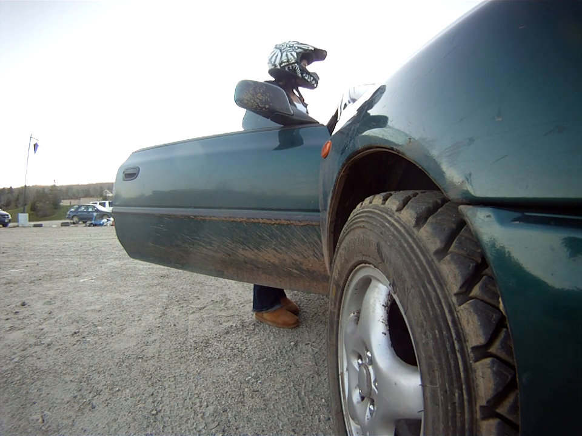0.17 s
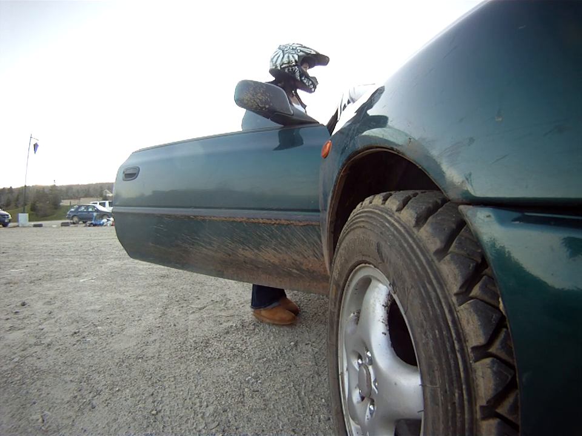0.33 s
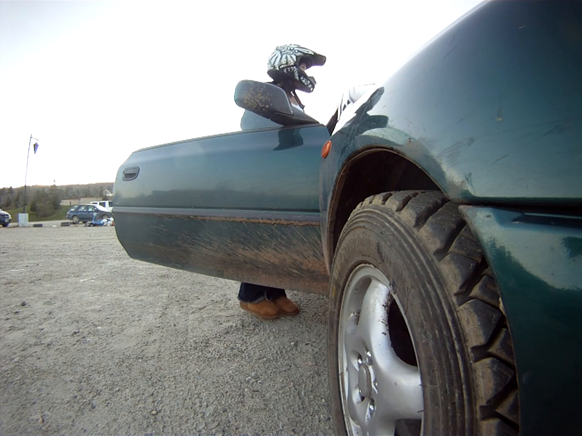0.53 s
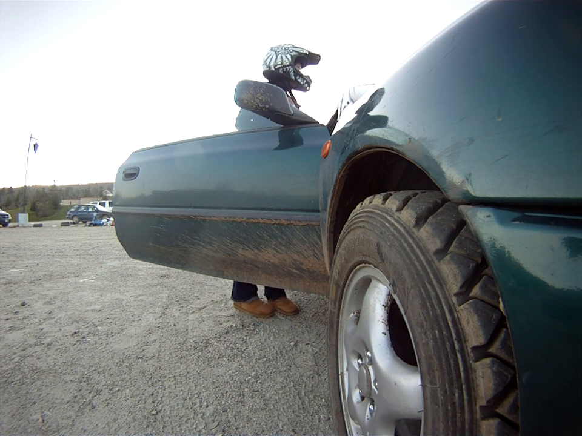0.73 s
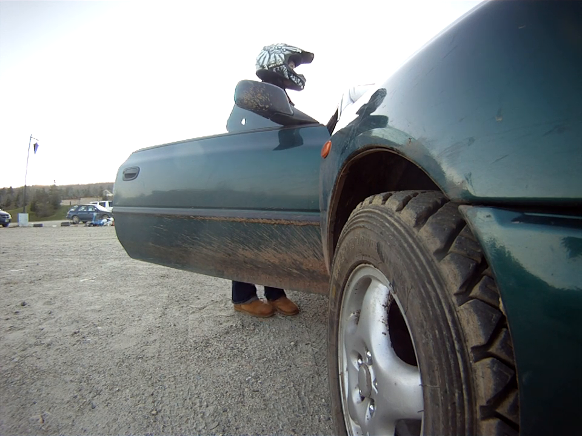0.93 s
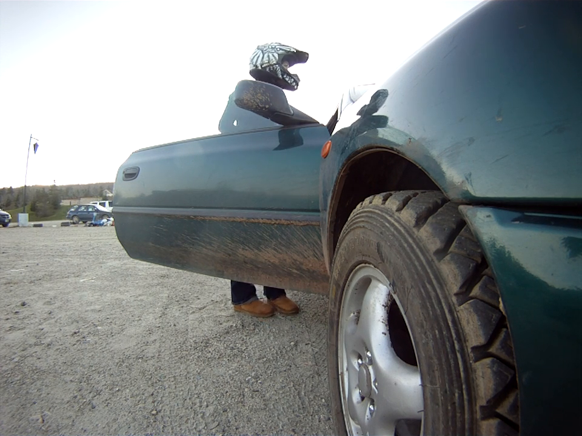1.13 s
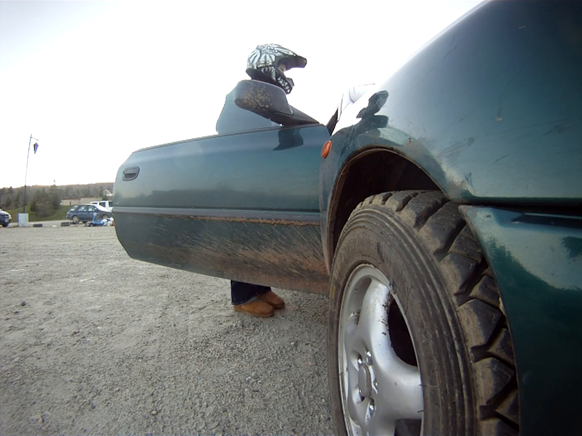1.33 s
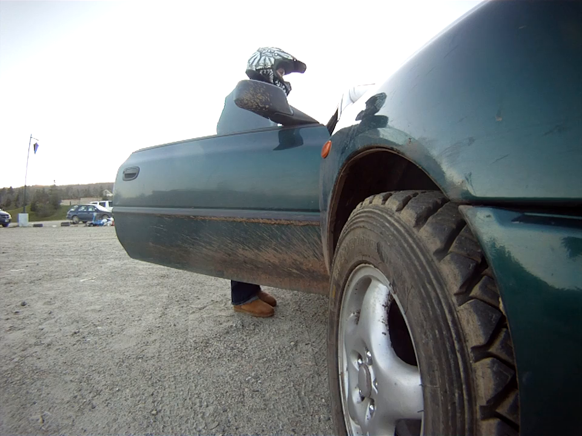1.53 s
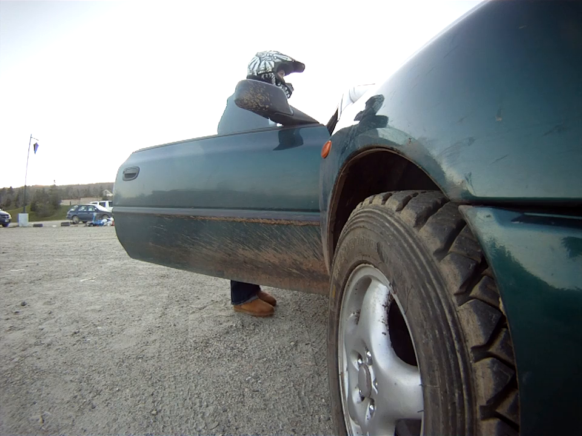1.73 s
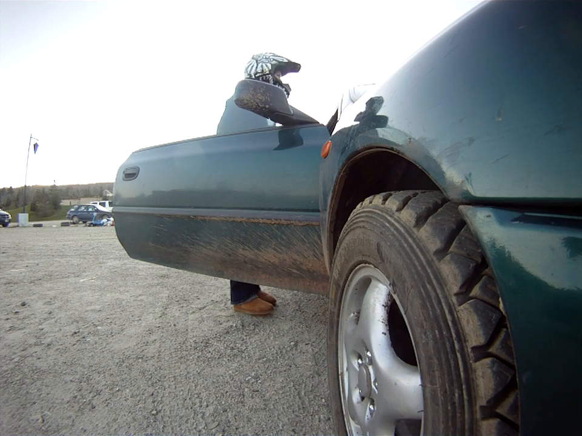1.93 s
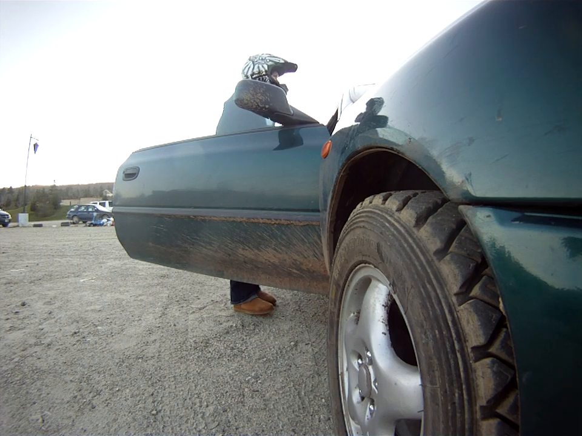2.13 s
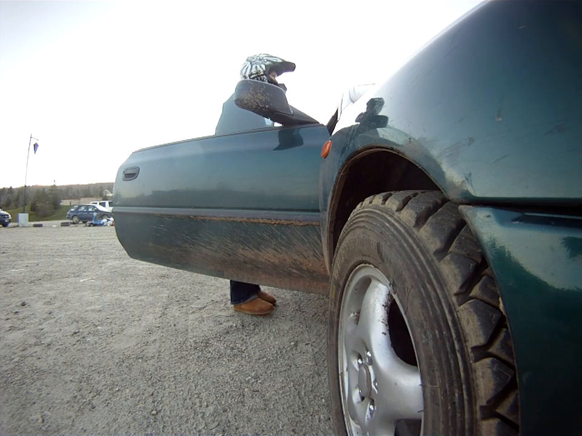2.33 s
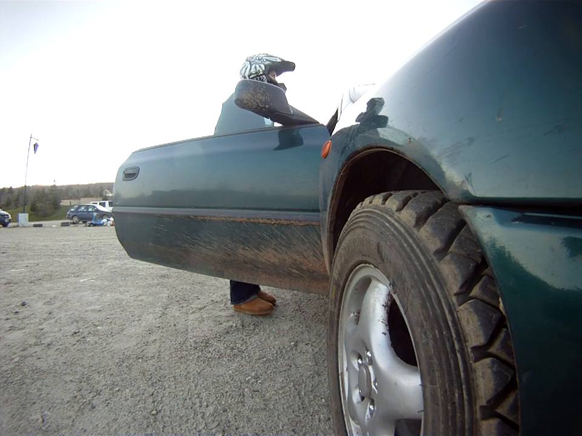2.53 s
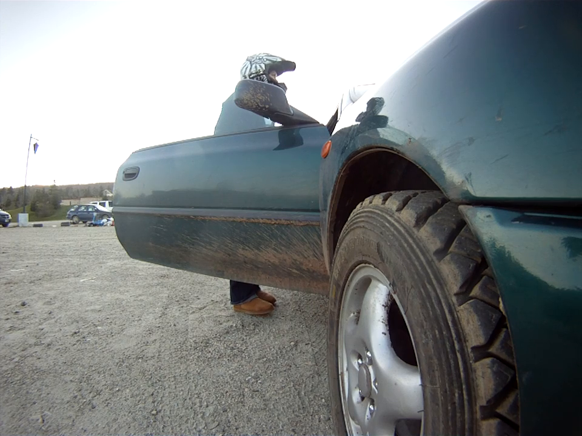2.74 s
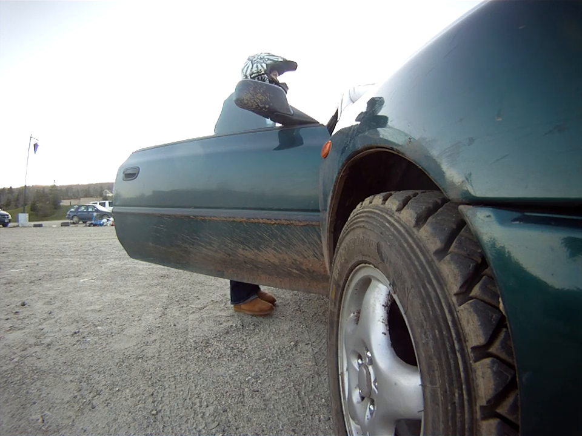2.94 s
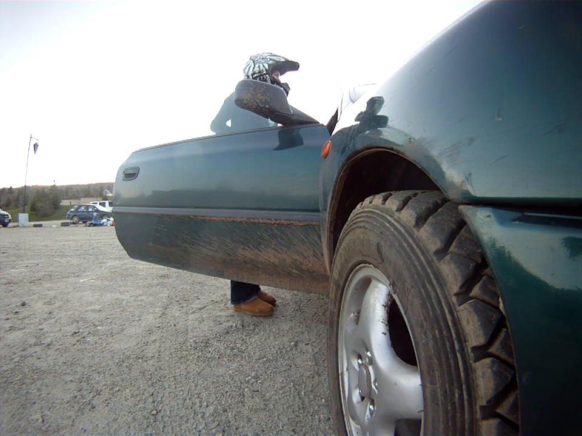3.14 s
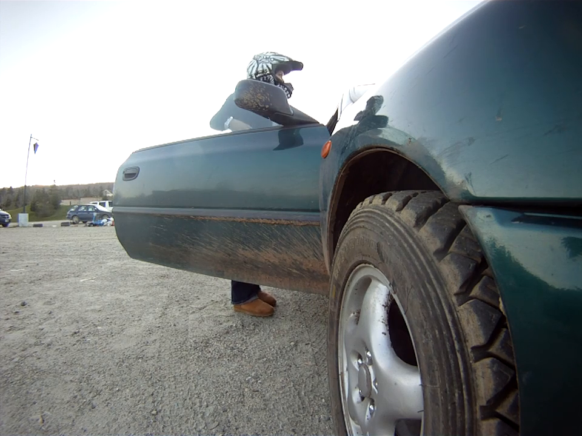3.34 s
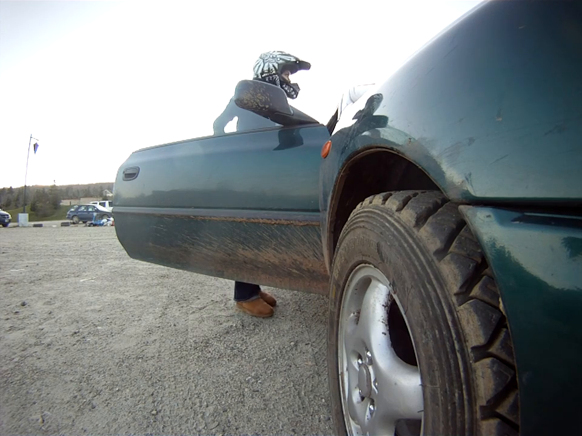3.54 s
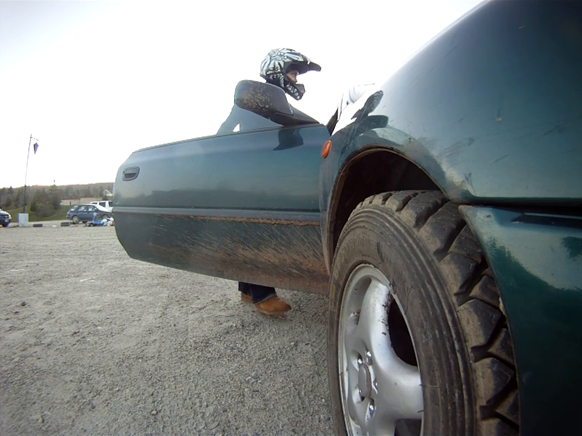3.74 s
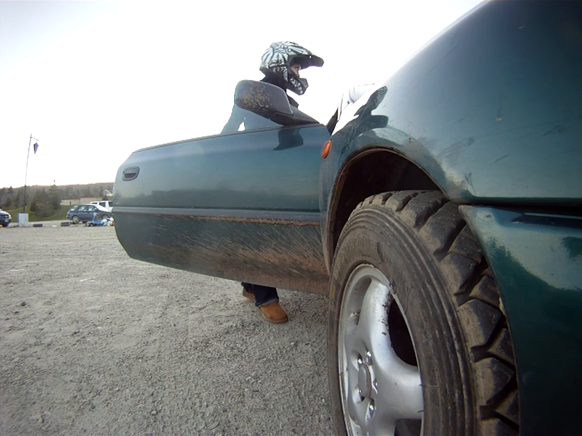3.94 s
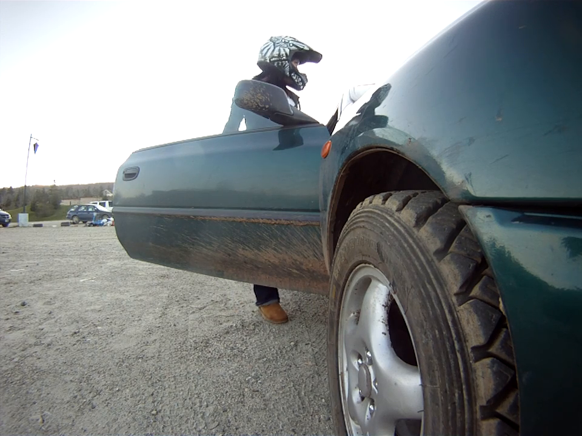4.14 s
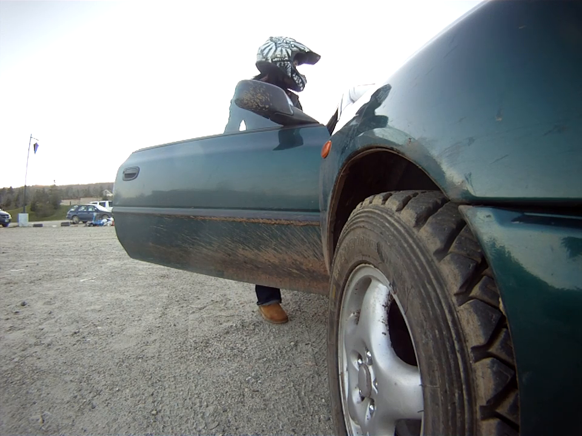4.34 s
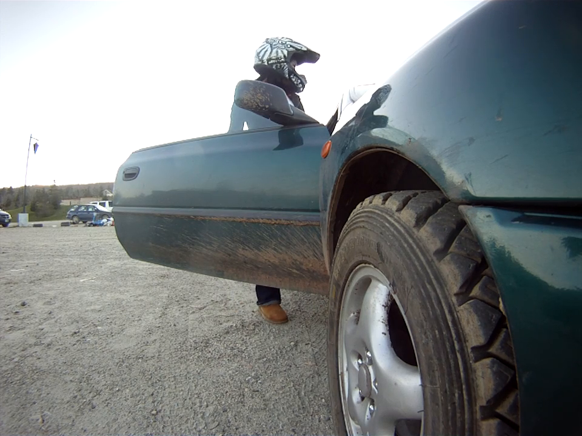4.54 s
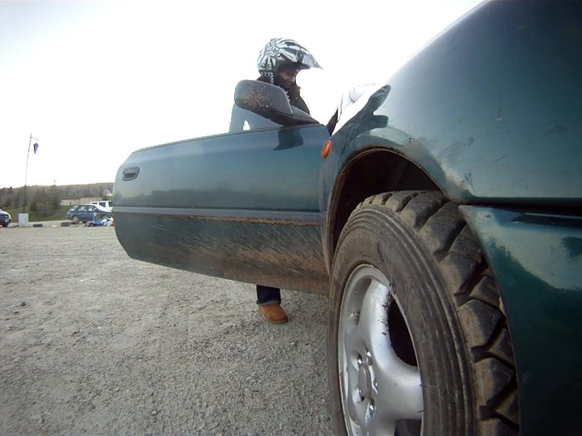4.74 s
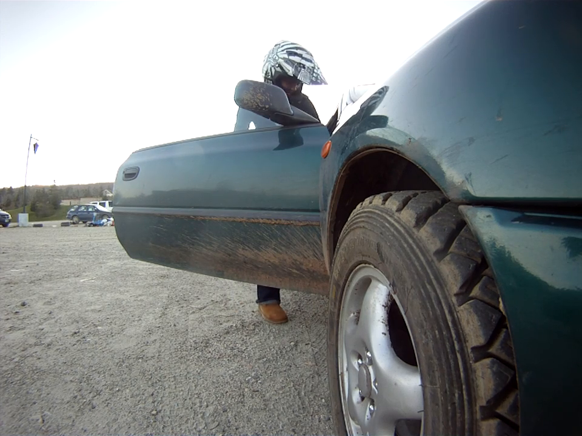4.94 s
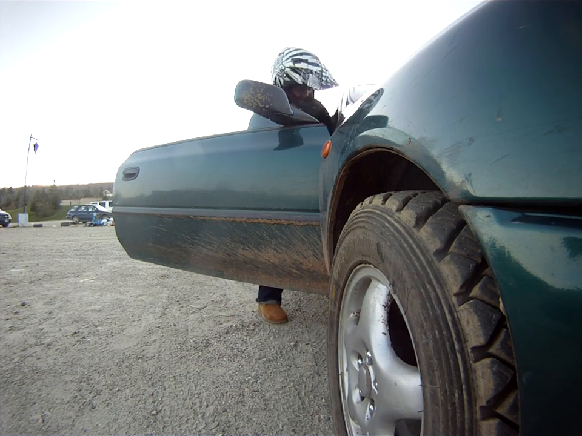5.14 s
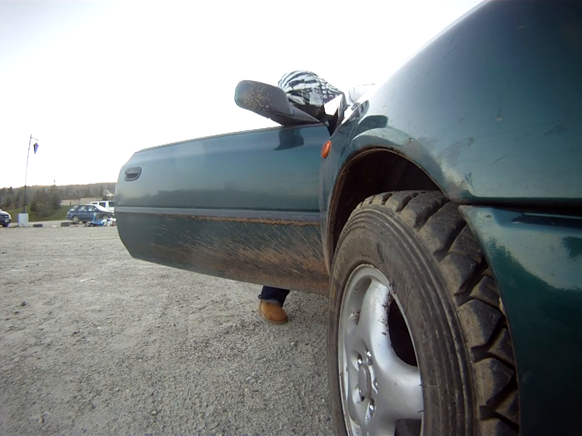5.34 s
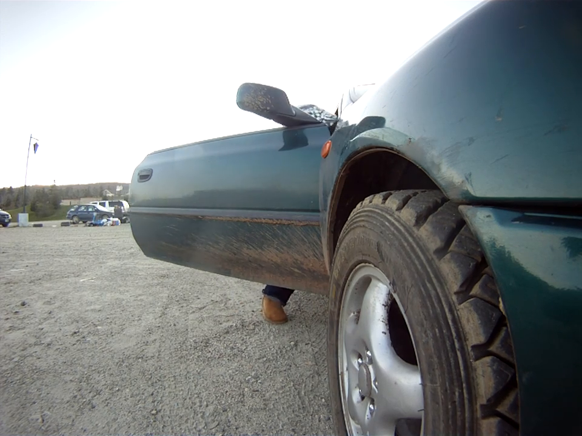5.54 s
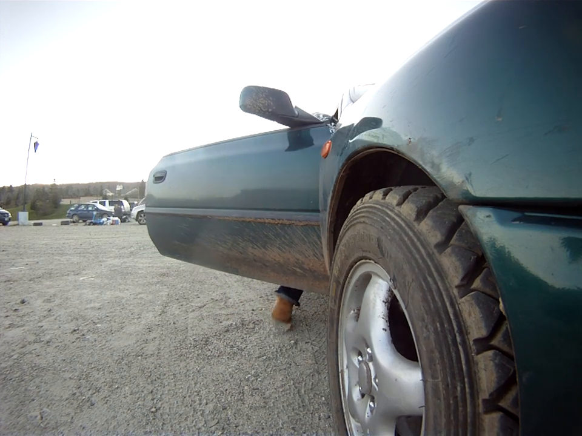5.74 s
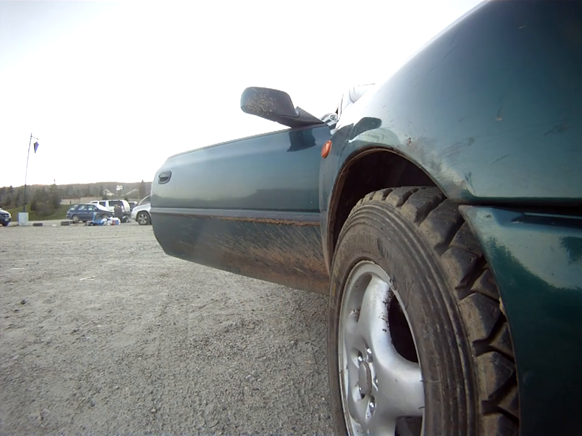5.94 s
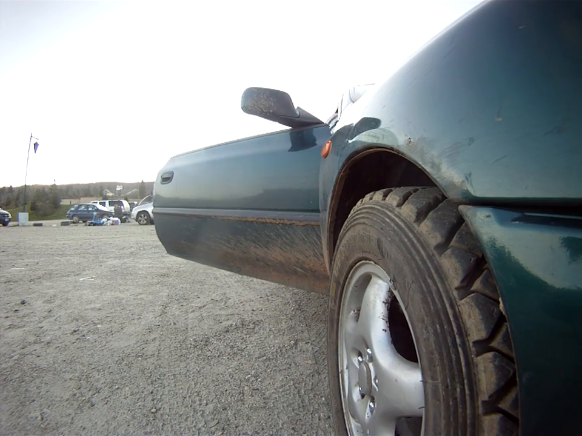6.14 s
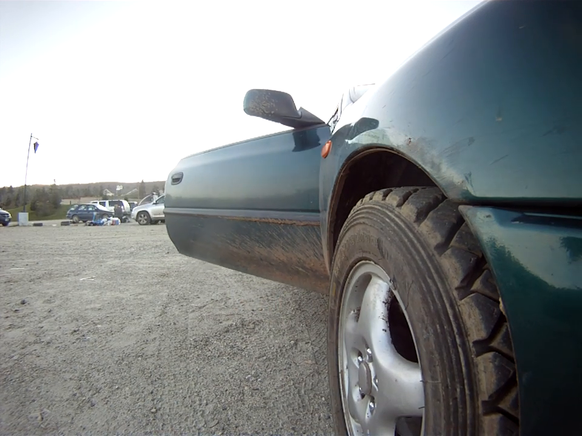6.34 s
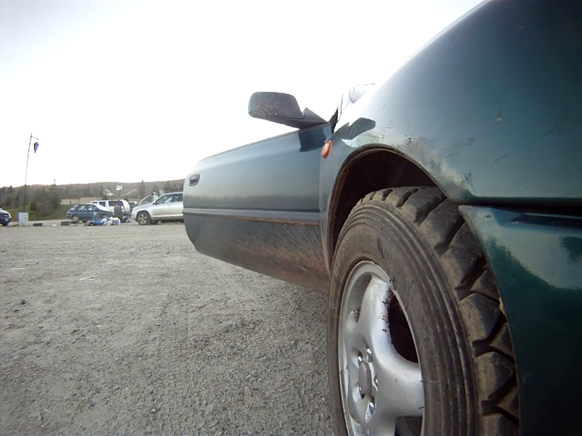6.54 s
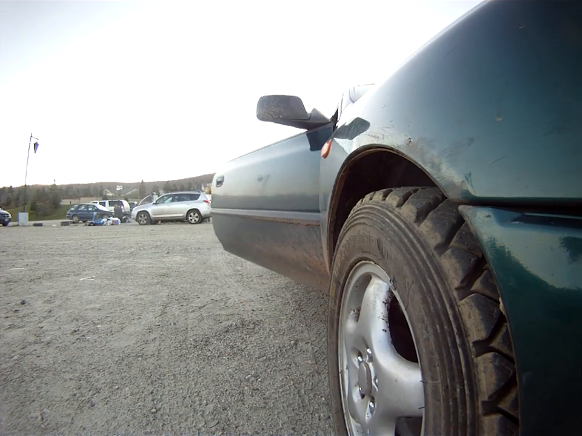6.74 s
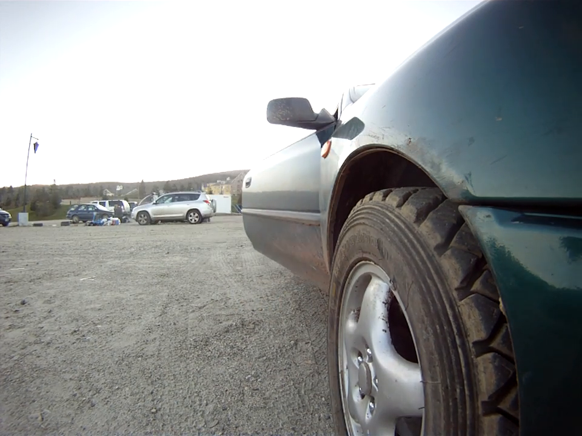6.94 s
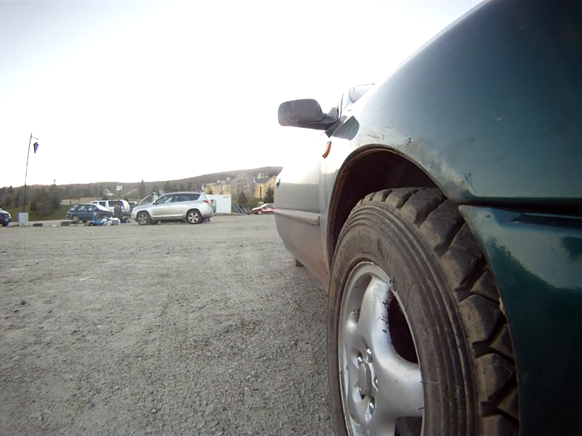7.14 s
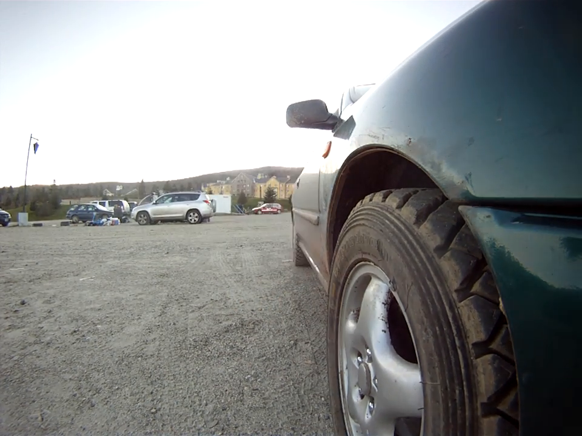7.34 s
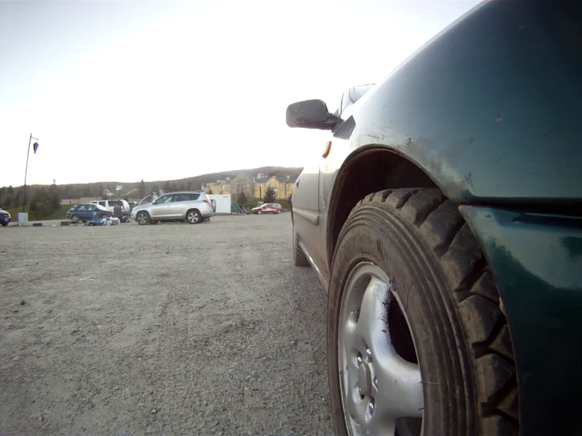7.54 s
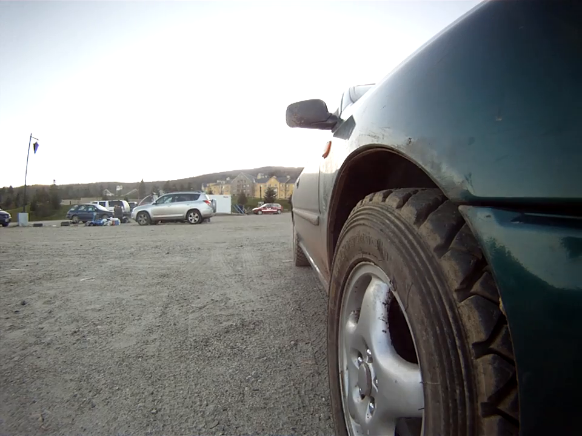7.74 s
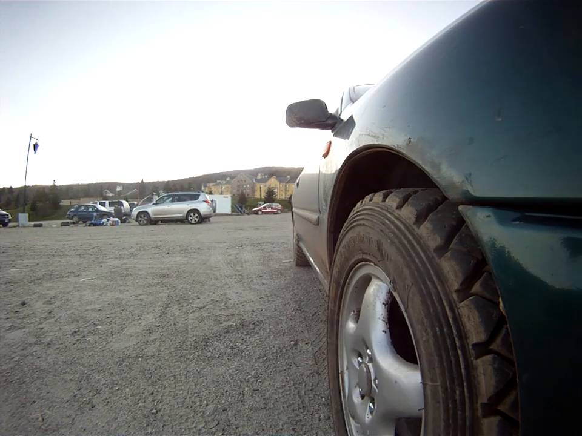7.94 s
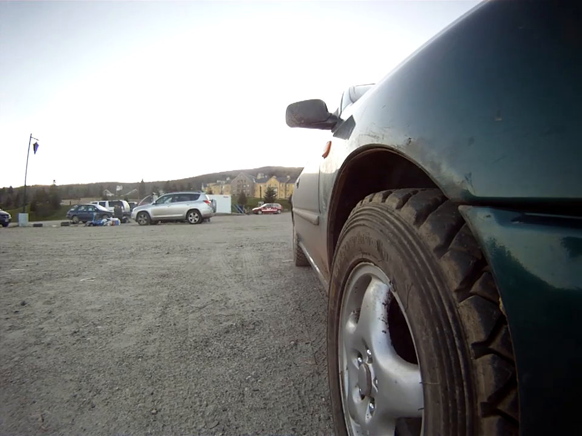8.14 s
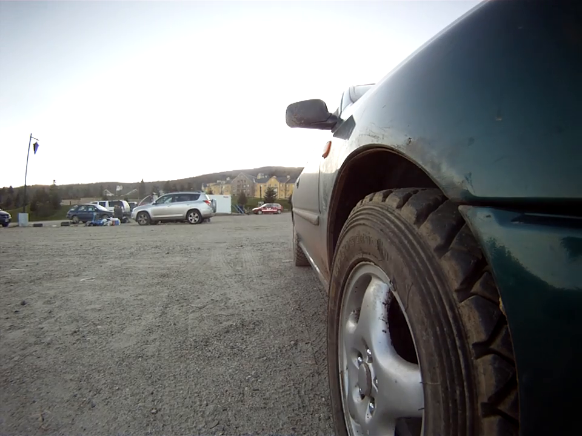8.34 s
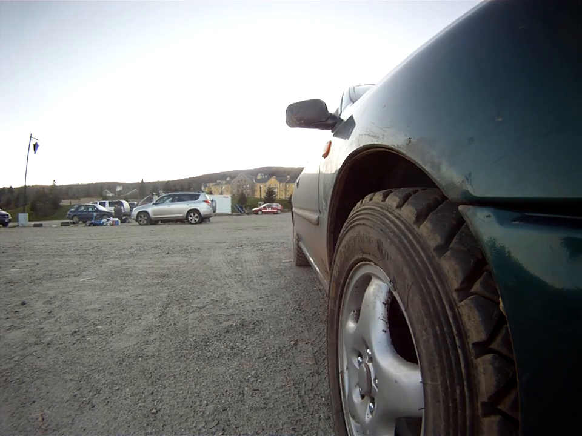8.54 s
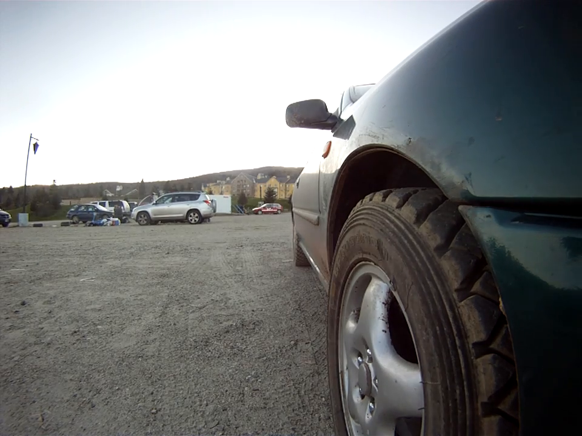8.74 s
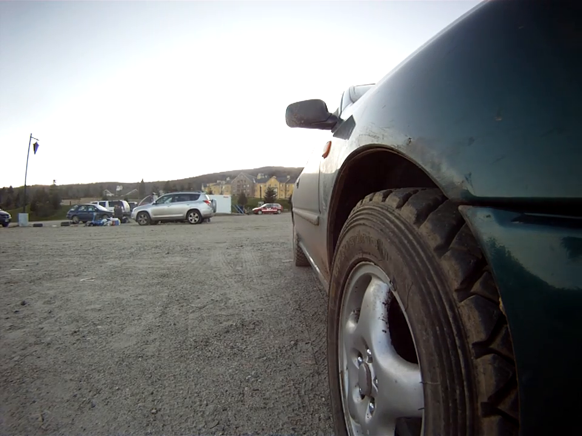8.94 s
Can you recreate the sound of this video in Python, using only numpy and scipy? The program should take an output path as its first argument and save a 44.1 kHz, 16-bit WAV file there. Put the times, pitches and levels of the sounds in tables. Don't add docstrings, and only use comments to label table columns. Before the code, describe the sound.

A car idles throughout on an open gravel lot, heard close through its bodywork by a small cased, clamped microphone: a low, slightly unsteady throb near 33 pulses a second, midrange whirr, dull hiss and a soft wind and exhaust wash. Faint machine hums lie beneath. A far engine drones up until about 1.5 s, returns near 1.8, climbs to 3.3, sinks by 4.4, then rises again and fades by 7.7. Light scuffs and stones scrape at 0.4-0.7 s; a dull knock comes at 2.7. Soft low bumps and a sill knock around 4.5 precede a hollow click and knock at 5.26, then a faint bright scrape at 5.6. At 7.3 the door slams: latch clacks, a brief air rush, a deep 60 Hz boom, ringing panels, and trim rattling until 7.55 while the mount shudders low. The idle carries on, with the far engine dipping and climbing from 8 s to the end at 9.

```python
import sys
import numpy as np
from scipy import signal
from scipy.io import wavfile
from scipy.ndimage import uniform_filter1d

SR = 44100
rng = np.random.default_rng(int(sys.argv[2]) if len(sys.argv) > 2 else 0)


def transcribe(u):
    v = np.clip(np.atleast_2d(u).T, -1, 1)
    q = np.round(v * 32767).astype(np.int16)
    wavfile.write(sys.argv[1], SR, q)


def nominal_scale(level):
    x = np.asarray(level, float) / 20
    return 10 ** x


N = 396018


def evened(x):
    return x / np.sqrt(np.mean(x ** 2) + 1e-20)


def curve(rows, column=1):
    rows = np.asarray(rows)
    return np.interp(np.arange(N) / SR, rows[:, 0], rows[:, column])


def drift(rate_hz):
    control_hz = 400
    steps = rng.standard_normal(int(N / SR * control_hz) + 2)
    slow = signal.lfilter(*signal.butter(2, np.clip(rate_hz, .1, 150), fs=control_hz), steps)
    return np.interp(np.arange(N) / SR * control_hz, np.arange(len(slow)), evened(slow))


def noise(points, patchy_db, size=1024, count=N):
    hz = np.fft.rfftfreq(size, 1 / SR)
    real, imaginary, patches = rng.standard_normal((count * 4 // size + 5, len(hz), 3)).T
    patches = uniform_filter1d(patches, size=9, axis=0)
    patches = evened(uniform_filter1d(patches, size=10, axis=1))
    point_hz, point_db = np.transpose(points)
    colour_db = np.interp(np.log(hz + 1), np.log(point_hz + 1), point_db)[:, None]
    spectra = (real + 1j * imaginary) * nominal_scale(colour_db + patchy_db * patches)
    return evened(signal.istft(spectra, nperseg=size, noverlap=size * 3 // 4)[1][:count])


def add(mix, start_s, rise_s, sharpness, peak_db, wave):
    span = slice(round(start_s * SR), round(start_s * SR) + SR)
    u = np.arange(len(mix[span])) / SR / rise_s
    envelope = (u * np.exp(1 - u)) ** sharpness
    mix[span] += nominal_scale(peak_db) * envelope * wave(np.arange(N)[span] / SR)


# multiple of the firing rate, level_db
ENGINE_ORDERS = [(1, -57), (2, -50), (3, -56), (4, -57), (5, -62), (6, -66), (7, -64), (8, -69), (9, -81),
                 (10, -69), (13, -80), (14, -73), (16, -78), (18, -79), (19, -74), (20, -80), (21, -70),
                 (22, -79), (23, -80), (29, -72), (30, -66), (31, -69), (32, -67), (33, -71), (34, -67),
                 (35, -69)]
# time_s, level_db
SECOND_ORDER_SURGE = [(0.0, -52), (1.05, -47), (1.3, -51), (2.2, -52), (2.9, -59), (3.3, -68), (3.75, -59),
                      (4.0, -49), (5.0, -49), (5.6, -54), (6.3, -46.5), (7.2, -50), (7.65, -56), (7.9, -65),
                      (8.23, -46), (8.45, -56), (8.73, -44), (8.98, -52)]


def firing_orders(firing_phase):
    lines, second_db = np.zeros(N), curve(SECOND_ORDER_SURGE)
    wavers = [drift(3.03) for _ in range(6)]
    for order, db in ENGINE_ORDERS:
        level_db = second_db if order == 2 else db - 0.15
        level = np.sqrt(2) * nominal_scale(level_db) * (1 + .22 * wavers[order % len(wavers)])
        lines += level * np.cos(order * firing_phase + 2 * np.pi * rng.random())
    return lines


# pitch_hz, density_db per Hz
WHIRR_COLOUR = [(210, -31), (350, -10.5), (388, -16), (460, -10.5), (514, -15.5), (696, -9), (763, -14.5),
                (846, -16.5), (979, -4.5), (1140, 4), (1210, -0.5), (1330, -16), (1500, -9), (1950, -42),
                (3300, -120)]
# pitch_hz, density_db per Hz
HISS_COLOUR = [(760, -35), (1300, -20), (1330, -13), (1530, -6.5), (1640, -7), (1800, -1.5), (2110, -4),
               (2280, -6), (2530, -4.5), (2730, -9.5), (2870, -15.5), (3670, -11), (4270, -23), (5020, -18),
               (6000, -31.5), (7800, -65), (13200, -120)]


def whirr_and_hiss(firing_phase):
    throb = .14 * np.cos(firing_phase)
    throb += 0.089 * np.cos(2 * firing_phase + 1.2)
    throb += 0.068 * np.cos(3 * firing_phase + .4)
    whirr = nominal_scale(-54) * (1 + throb) * noise(WHIRR_COLOUR, 1.1)
    hiss_level = nominal_scale(-56.5 + 0.25 * drift(30.0))
    hiss = hiss_level * (1 + 0.35 * throb) * noise(HISS_COLOUR, 1.14, size=512)
    return whirr + hiss


# pitch_hz, density_db per Hz
WASH_COLOUR = [(7.1, -37), (12, 1), (96, 2), (139, -2.5), (198, -13.5), (316, -10.5), (400, -27.5),
               (520, -58), (880, -120)]


def wash():
    return nominal_scale(-51.5) * noise(WASH_COLOUR, 1.6, size=4096)


def idle():
    firing_hz = 33.19 * (1 + 0.002487 * drift(0.5965))
    firing_phase = 2 * np.pi * np.cumsum(firing_hz) / SR
    return firing_orders(firing_phase) + whirr_and_hiss(firing_phase) + wash()


# pitch_hz, level_db
HUM_TONES = [(47.5, -61), (55, -60), (71, -62), (84, -60), (108, -64), (116, -64), (141, -61)]


def hums():
    t, out = np.arange(N) / SR, np.zeros(N)
    for hz, db in HUM_TONES:
        out += np.sqrt(2) * nominal_scale(db + 2.5 * drift(1.2)) * np.sin(2 * np.pi * (hz * t + rng.random()))
    return out


# time_s, strongest line pitch_hz, level_db
FIRST_PASS = [
    (0, 210, -64),
    (.3, 224, -57),
    (.45, 230, -57),
    (.69, 226, -56.5),
    (.9, 236, -58),
    (1.2, 232, -60),
    (1.6, 232, -75),
]
SECOND_PASS = [(1.7, 108, -66), (1.9, 119, -51.5), (2.05, 129, -50), (2.3, 168, -46.5), (2.6, 200, -53),
               (2.85, 205, -50), (3.1, 215, -51), (3.27, 227, -52), (3.7, 204, -50), (4, 170, -54),
               (4.38, 139, -51), (4.6, 176, -51.5), (4.75, 189, -53.5), (5.05, 200, -56), (5.5, 196, -57),
               (6.25, 218, -60), (7, 228, -62), (7.7, 229, -72)]
THIRD_PASS = [
    (7.8, 212, -75),
    (8.0, 186, -64),
    (8.2, 162, -55),
    (8.4, 156, -52.5),
    (8.65, 161, -56),
    (8.98, 172, -55),
]
# multiple of the strongest line, relative level_db
FAR_LINES = [(.5, -6), (1, -0.5), (2.0, -20.5)]
UPPER_LINE_DB = (-7, -17, -14)


def far_engine():
    out = np.zeros(N)
    unsteady, flutter = drift(5.0), [drift(5.9) for _ in range(4)]
    for rows, upper_db in zip((FIRST_PASS, SECOND_PASS, THIRD_PASS), UPPER_LINE_DB):
        span = slice(round(rows[0][0] * SR), round(rows[-1][0] * SR))
        speed_hz = uniform_filter1d(curve(rows), size=2000) * (1 + .005 * unsteady)
        phase = 2 * np.pi * np.cumsum(speed_hz[span]) / SR
        pass_db = curve(rows, column=2)
        for (order, db), air in zip(list(FAR_LINES) + [(3 / 2, upper_db)], flutter):
            level = np.sqrt(2) * nominal_scale((pass_db + db + 2.6 * air)[span])
            out[span] += level * np.sin(order * phase)
    return out


# start_s, peak_db, rise_s, sharpness
CLAMP_NUDGES = [
    (.12, -50, .15, 1.5),
    (3.95, -49, .13, 2.5),
    (4.4, -45, .17, 2.5),
    (4.85, -41, .2, 2.5),
    (5.12, -40, .18, 4.0),
    (6.1, -49, .12, 2.5),
    (6.92, -49, .12, 2.5),
    (8.1, -50, .2, 2.5),
]
# multiple of the swing rate, start_s, peak_db, rise_s, sharpness
CLAMP_SWINGS = [
    (1, 7.26, -23, .2, 3.2),
    (1, 7.77, -39, .09, 1.6),
    (2, 7.305, -21, .145, 4.0),
    (4, 7.4, -36, .06, 1.2),
]


def mount():
    swing_hz, phase = 20.5, rng.random()
    rest = nominal_scale(-61 + 5 * drift(4))
    out = np.sqrt(2) * rest * np.cos(2 * np.pi * (swing_hz * np.arange(N) / SR + phase))
    for k, start, db, rise, sharp in list(CLAMP_SWINGS) + [(1, *row) for row in CLAMP_NUDGES]:
        lag = (1 - k) * np.pi / 2
        add(out, start, rise, sharp, db, lambda t: np.cos(2 * np.pi * k * (swing_hz * t + phase) - lag))
    return out


# pitch_hz, half_width_hz
CASE_BANDS = [(2600, 290), (1870, 195), (1116, 220), (3090, 150), (3720, 180), (5120, 330)]
# time_s, peak_db
STONES = [
    (.6629, -54),
    (.6784, -55),
    (1.25, -59),
]
# time_s, peak_db
KNOCKS = [
    (2.695, -49),
    (4.4714, -52),
    (5.2644, -51),
    (7.2759, -49),
    (7.2804, -52),
    (7.2874, -48),
    (7.3154, -43.5),
    (7.3674, -47),
]
# time_s, peak_db
STRIKES = [
    (5.2574, -48),
    (7.2953, -44),
    (7.3052, -44),
    (7.3342, -49),
    (7.3854, -56),
]
# time_s, peak_db
CLAW_GRINDS = [
    (7.281, -57),
    (7.295, -48.5),
]
# time_s, peak_db
TRIM_RATTLES = [
    (7.358, -42),
    (7.3931, -50),
    (7.412, -39.5),
    (7.4174, -44),
    (7.442, -40),
    (7.4749, -54),
    (7.5133, -39.5),
    (7.5338, -46),
]
# time_s, peak_db, upper_db, top_db, dying_s
SCRAPES = [
    (5.595, -67, -3, 8, .45),
    (.664, -56, 7, -14, .11),
    (.4, -62, 2, -4, .1),
    (5.25, -52, -8, -16, .03),
]


def ticks():
    out, t = np.zeros(N + SR), np.arange(5000) / SR
    bursts = rng.standard_normal((40, len(t)))
    bands = [signal.butter(2, [hz - width, hz + width], "band", fs=SR, output="sos") for hz, width in CASE_BANDS]
    wide = signal.butter(4, [700, 4100], "band", fs=SR, output="sos")
    # low_db, upper_db, top_db, dying_s
    kinds = [(STONES, (-4, 5, -20, .035)), (KNOCKS, (9, -8, -14, .015)), (STRIKES, (5, -3, -4, .02)),
             (CLAW_GRINDS, (11, 2, -5, .05)), (TRIM_RATTLES, (2, -8, -32, .013))]
    rows = [(*row, *kind) for table, kind in kinds for row in table]
    rows += [(s, db, -4, *rest) for s, db, *rest in SCRAPES]
    for (s, db, low_db, upper_db, top_db, dying_s), burst in zip(rows, bursts):
        here = slice(round(s * SR), round(s * SR) + len(t))
        burst = burst * nominal_scale(-60 * t / max(dying_s, .004))
        snap = signal.sosfilt(wide, burst)
        out[here] += nominal_scale(db - 5) * snap / abs(snap).max()
        parts_db = (-1.5, -3.5, low_db - 2.5, upper_db - 4.5, upper_db - 4.5, top_db)
        for band, part_db in zip(bands, parts_db):
            ring = signal.sosfilt(band, signal.sosfilt(band[:1], burst))
            out[here] += nominal_scale(db + part_db) * ring / abs(ring).max()
    return out[:N]


# start_s, pitch_hz, peak_db, rise_s, sharpness
BODY_MODES = [(7.272, 71, -31, .018, 2.1), (7.303, 62.4, -14.7, 0.03, 1.5), (7.37, 60, -23, 0.023, 0.97),
              (7.45, 64, -31, .037, 0.84), (7.55, 69, -31, .026, 3.6), (7.33, 88, -29.5, .035, .8),
              (7.56, 82, -34, 0.056, 1.2), (7.308, 100, -34, 0.012, 3.7), (7.29, 120, -37, .04, 0.74),
              (7.307, 322, -29.5, 0.029, 3.8), (7.295, 277, -35.5, 0.032, 1.4),
              (7.303, 185, -37.5, 0.018, 3.4), (7.306, 395, -44.5, 0.022, 3.0),
              (7.38, 320, -45, 0.025, 1.1), (6.2, 325, -56, 0.07, 1.0), (5.263, 325, -31.5, .027, 1.7),
              (5.264, 305, -43, .02, 1.8), (5.264, 275, -46.5, 0.018, 1.7), (5.4, 315, -51.5, 0.026, 1.5),
              (4.49, 315, -50, 0.036, 1.7), (8.1, 320, -54.5, .04, 1.5), (3.9, 290, -55, 0.041, 1.5),
              (6.12, 150, -48, .03, 1.5)]


def bodywork():
    out = np.zeros(N)
    for (start, hz, db, rise, sharp), phase in zip(BODY_MODES, rng.random(40)):
        add(out, start, rise, sharp, db, lambda t: np.sin(2 * np.pi * (hz * t + phase)))
    return out


# time_s, level_db
SEAL_RUSH = [
    (7.26, -70),
    (7.285, -56),
    (7.305, -50),
    (7.34, -55),
    (7.4, -61),
    (7.5, -63),
    (7.6, -75),
]
# pitch_hz, density_db per Hz
SEAL_COLOUR = [(210, -27), (350, -3), (470, -1), (1090, -5), (1180, -9), (1610, -22), (1870, -15),
               (3120, -15), (3350, -29), (5120, -17), (5900, -37), (7670, -67), (13000, -120)]


def seal():
    out = np.zeros(N)
    span = slice(round(SEAL_RUSH[0][0] * SR), round(SEAL_RUSH[-1][0] * SR))
    rush = noise(SEAL_COLOUR, 2.7, size=256, count=SR // 2)
    out[span] = nominal_scale(curve(SEAL_RUSH)[span]) * rush[:span.stop - span.start]
    return out


def scene():
    return (idle() + hums() + far_engine() + mount() + ticks() + bodywork() + seal())[None]


def top_cut(x):
    return signal.sosfilt(signal.butter(12, 15550, fs=SR, output="sos"), x)


def record(dry):
    window = ("kaiser", 9.0)
    lowpass = signal.firwin(147 * 60 + 1, 1 / 147 * .985, window=window)
    slow = signal.resample_poly(dry, 40, 147, axis=1, window=lowpass)
    held = np.repeat(slow, 4, axis=1)
    out = signal.resample_poly(held, 147, 160, axis=1, window=window)[:, :N]
    out = np.pad(out, ((0, 0), (0, N - out.shape[1])))
    edge = signal.firwin(511, 15600, window=window, fs=SR)
    out = signal.oaconvolve(out, edge[None], "same")
    return top_cut(out)


dry = scene()
out = record(dry)
transcribe(out)
```